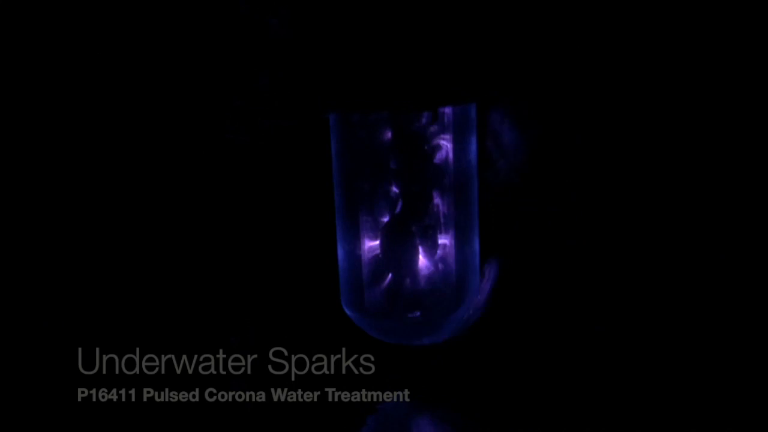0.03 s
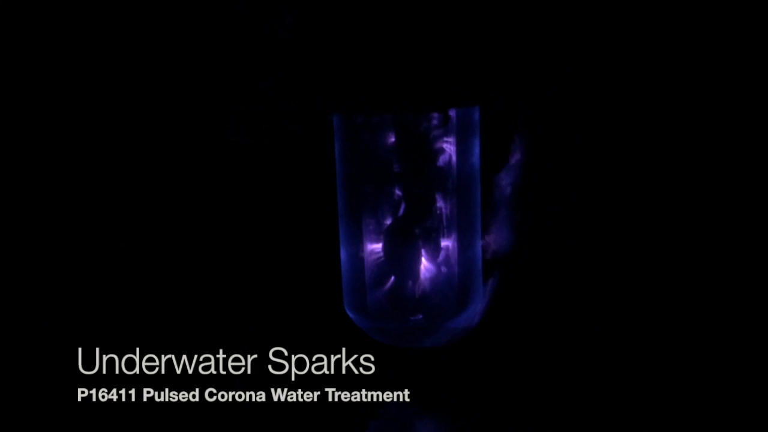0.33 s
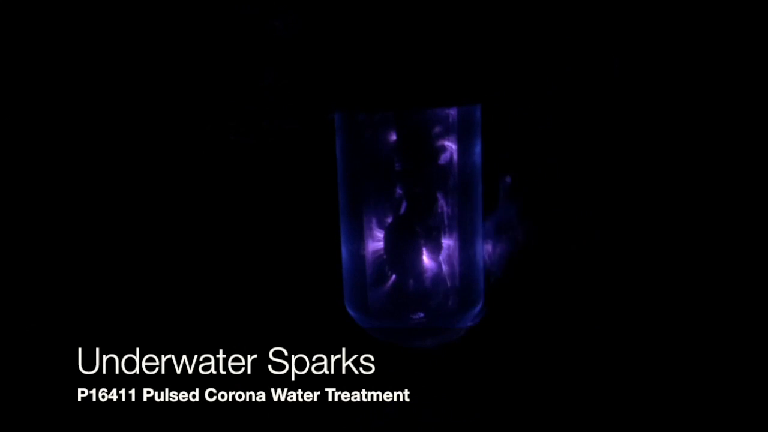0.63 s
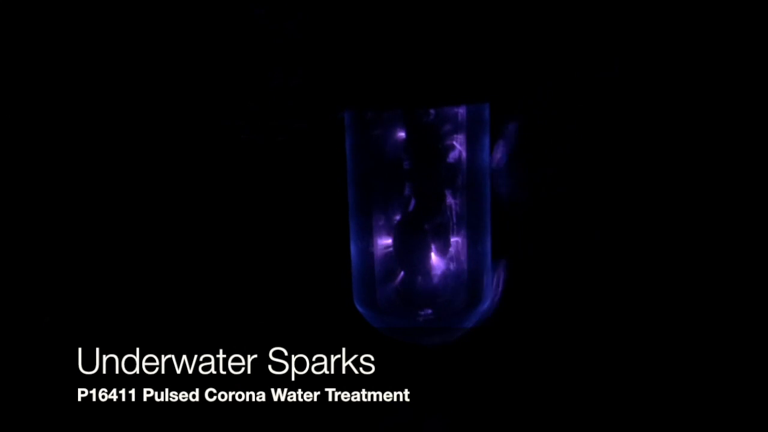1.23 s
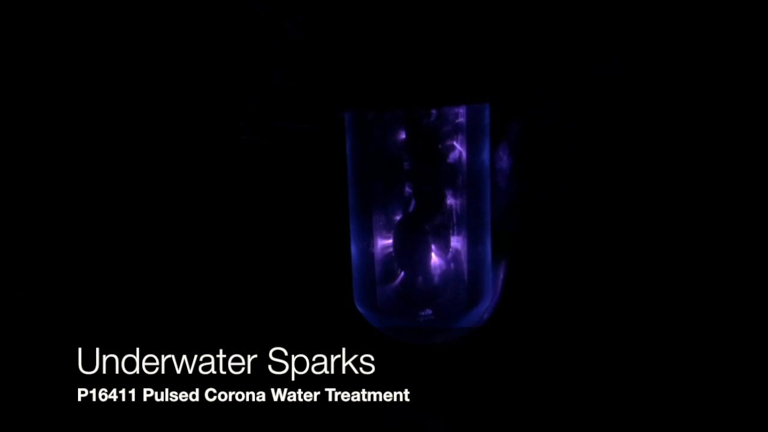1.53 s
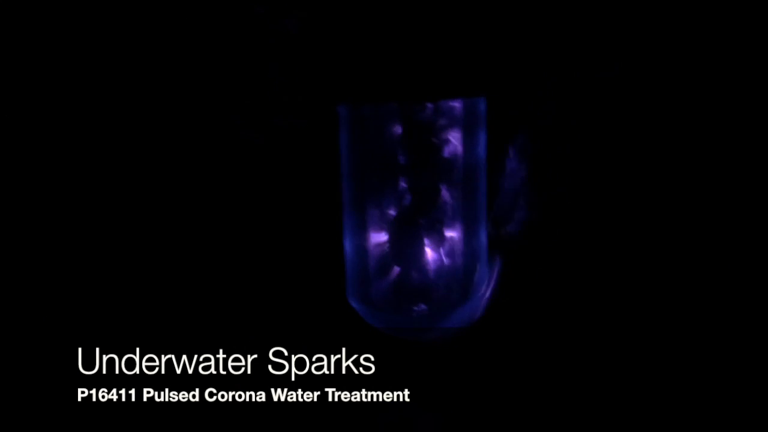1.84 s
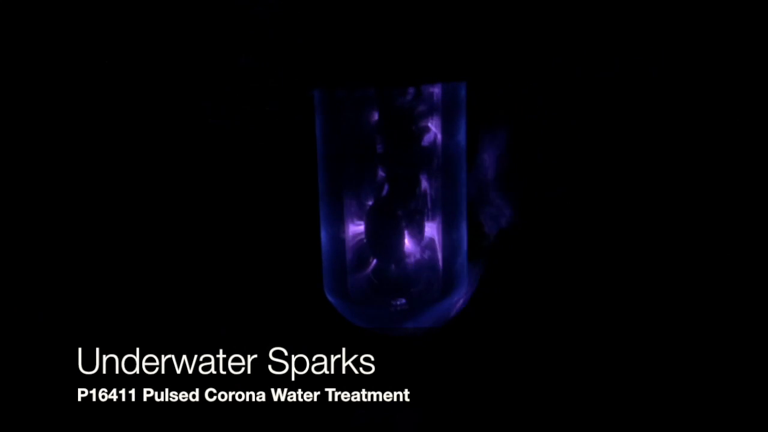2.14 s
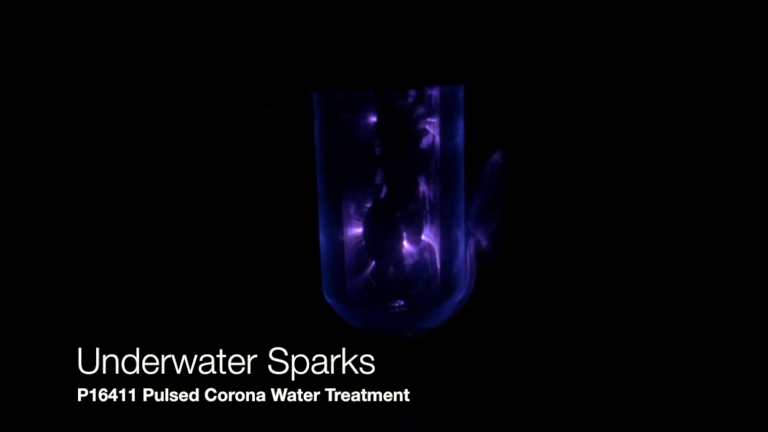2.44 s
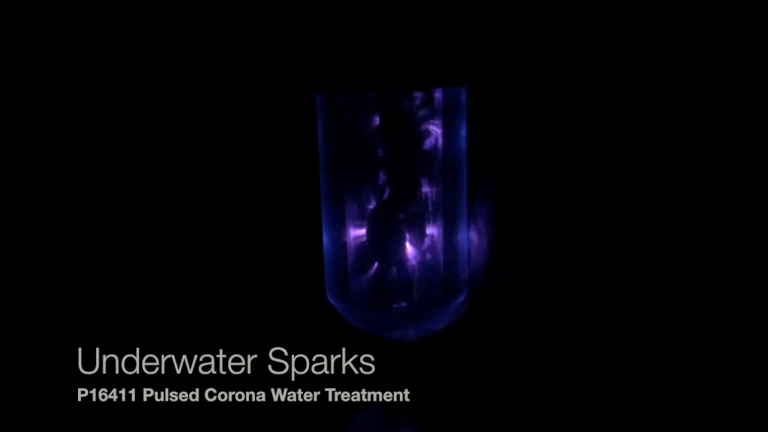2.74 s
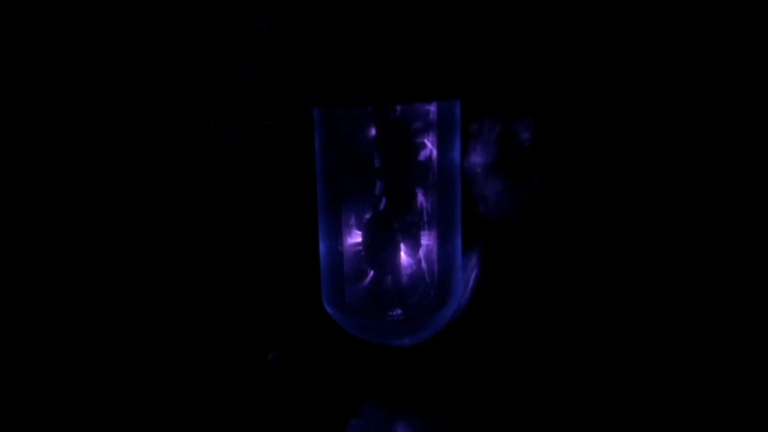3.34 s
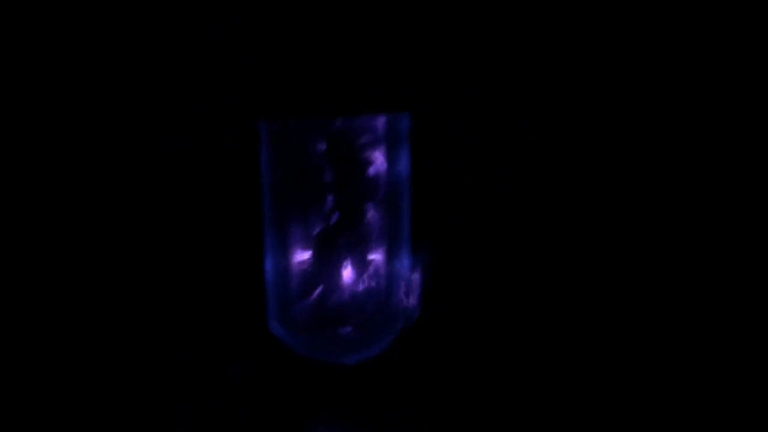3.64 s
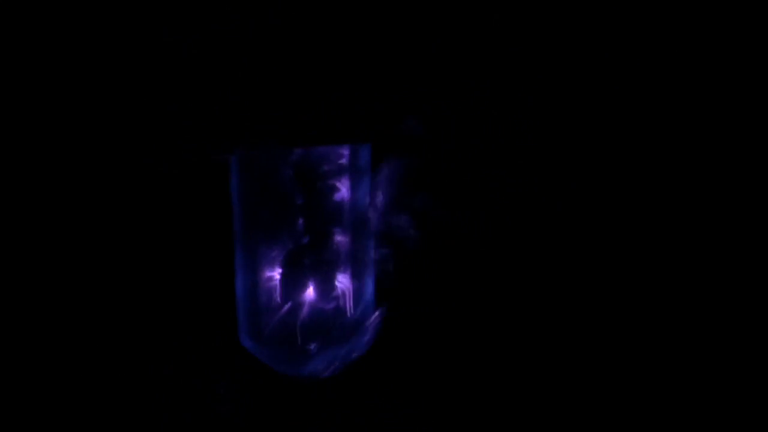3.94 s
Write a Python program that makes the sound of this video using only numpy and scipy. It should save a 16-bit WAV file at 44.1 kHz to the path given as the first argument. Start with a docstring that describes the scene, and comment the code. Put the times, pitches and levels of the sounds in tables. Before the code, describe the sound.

Electrical apparatus hums steadily with rushing fans, faint spark ticks and tiny watery blips.

```python
"""Small ticks and watery blips sound over a low drone, a rush of air and a thin whine.
A pulsed high-voltage rig sparks inside a tube of water in a laboratory: each discharge is a brief
burst of noise, and bubbles ring and excite the modes of the tube. Now and then something is bumped.
Behind them the power supply whines, and turbulence from the ventilation and the cooling fans
is coloured by the resonances of ducts and cabinet."""
import sys
import numpy as np
from scipy import signal
from scipy.fft import rfft, irfft
from scipy.io import wavfile

SR = 44100
rng = np.random.default_rng(int(sys.argv[2]) if len(sys.argv) > 2 else 0)


def wrap_up_sound(samples):
    """Save the sound to the file named by the first command line argument, as 16-bit audio."""
    columns = np.atleast_2d(samples).T
    # keep every value between -1 and 1, then stretch to whole-number steps
    tamed = np.clip(columns, -1, 1)
    steps = np.round(tamed * 32767).astype(np.int16)
    wavfile.write(sys.argv[1], SR, steps)


N = 176400


def tick(hz, width, t60):
    """Impulsive excitation: a discharge gives a wide crack, a narrow ring and a reverberant tail."""
    t = np.arange(SR // 4) / SR
    sputter_db, sputter_step_s = 9, .0012
    tail_db, room_t60_s = -19, .2
    crack_db, crack_t60_s, crack_span = -4, .022, 2.7   # span: frequency ratio either side of hz
    knots = np.arange(0, t[-1] + sputter_step_s, sputter_step_s)
    jitter = np.interp(t, knots, rng.uniform(-.88, 1, len(knots)))
    sputter = rms_one(from_db(sputter_db * jitter))
    tail = sputter * from_db(tail_db - 60 * t / room_t60_s)
    burst = rng.standard_normal(len(t)) * (from_db(-60 * t / t60) + tail)
    ring = band(burst, hz - width / 2, hz + width / 2) * np.sqrt(SR / 2 / width)
    crack = rng.standard_normal(len(t)) * sputter * from_db(crack_db - 60 * t / crack_t60_s)
    return ring + band(crack, hz / crack_span, min(hz * crack_span, 13000))


# The distinct discharges, and the sharp snaps that open the bubbles at .925 and .977 s. Each row: start in
# seconds, # level in dB, centre frequency in Hz, bandwidth in Hz, time to decay by 60 dB (t60) in seconds.
SPARKS = [(0.107, -60, 6380, 926, 0.085), (.293, -57.5, 11800, 3000, .025), (.340, -62, 8700, 2000, .03),
          (.405, -55.5, 9600, 1400, .035), (.459, -55, 13000, 7000, 0.021), (.517, -55.5, 6160, 700, 0.036),
          (0.56, -44, 10150, 1100, 0.017), (.877, -63, 9700, 2000, .02), (.925, -60, 8500, 3000, .02),
          (.977, -62, 6800, 1200, .03), (1.091, -65.5, 8200, 700, .06), (1.208, -68, 8500, 1000, 0.023),
          (1.687, -65, 11000, 2000, .025), (1.986, -52, 6230, 750, 0.031), (2.207, -63, 8800, 1000, .02),
          (2.272, -57, 10400, 1000, .03), (2.321, -56, 5700, 500, .05), (2.4389, -41, 9500, 2200, 0.023),
          (2.470, -62, 9770, 1500, .035), (2.929, -46.5, 6660, 950, 0.036), (2.935, -58, 11000, 4000, .03),
          (3.023, -63, 14000, 2000, .02), (3.653, -57, 8000, 4000, .02), (3.721, -53.5, 6750, 1800, .045)]

def discharges():
    """Superposed transients: distinct sparks stand out from a faint crackle of randomly timed ones."""
    out = np.zeros(N)
    for start, db, hz, width, t60 in SPARKS:
        add(out, start, from_db(db) * tick(hz, width, t60))
    crackle_per_s, crackle_db, spread_db = 18, -66.5, 3.5
    low_hz, high_hz = 7000, 12200
    for when, pitch, size in rng.random((int(crackle_per_s * N / SR), 3)):
        hz = low_hz + pitch * (high_hz - low_hz)
        db = crackle_db + spread_db * (2 * size - 1)
        add(out, when * N / SR, from_db(db) * tick(hz, width=1500, t60=.01))
    return out


# Modes of the water-filled tube. Each row: frequency in Hz, relative level in dB, t60 in seconds.
TUBE_MODES = [(3670, -5, 0.098), (3935, -9.5, 0.059), (4200, -13, 0.23), (5150, -26, .07)]

def blip(hz, t60):
    """Free vibration: a bubble rings at one pitch, excites the tube's modes and leaves a soft wash."""
    t = np.arange(SR // 4) / SR
    attack_s, mode_spread_db = .002, 2
    wash_db, wash_width_hz, wash_t60_s = -11.5, 1100, .19
    bubble = np.sqrt(2) * from_db(-60 * t / t60) * np.sin(2 * np.pi * hz * t)
    tube = np.zeros(len(t))
    for mode_hz, db, mode_t60 in TUBE_MODES:
        mode_db = db + mode_spread_db * rng.standard_normal()
        tube += from_db(mode_db - 60 * t / mode_t60) * np.sin(2 * np.pi * mode_hz * t)
    noise = band(rng.standard_normal(len(t)), hz - wash_width_hz / 2, hz + wash_width_hz / 2)
    wash = rms_one(noise) * from_db(wash_db - 60 * t / wash_t60_s)
    return (bubble + tube + wash) * (1 - np.exp(-t / attack_s))


# Bubbles in the tube. Each row: start in seconds, level in dB, pitch in Hz, t60 in seconds.
BUBBLES = [(.125, -49.5, 3880, .06), (0.459, -53, 2760, 0.17), (.517, -45, 4560, 0.055),
           (.590, -56, 4990, 0.065), (.926, -42, 4540, .045), (.976, -40.5, 3890, .06),
           (1.070, -51, 5050, .045), (1.080, -49, 3600, 0.054), (1.451, -50.5, 3720, 0.081),
           (2.225, -53, 4580, 0.084), (2.320, -49, 4665, 0.071), (3.567, -47.5, 3510, 0.049)]

def water():
    """Bubble resonance: each bubble sounds a short blip at its own natural frequency."""
    out = np.zeros(N)
    for start, db, hz, t60 in BUBBLES:
        add(out, start, from_db(db) * blip(hz, t60))
    return out


# Soft impacts. Each row: start in seconds, level in dB, frequency in Hz, t60 in seconds.
IMPACTS = [(.517, -17, 119.7, 0.24), (.585, -24, 126, .06), (2.93, -42.5, 1564, 0.16),
           (3.933, -23, 910, 0.046)]

def bumps():
    """Damped oscillation: each soft bump excites a single mode that decays exponentially."""
    out = np.zeros(N)
    t = np.arange(SR // 2) / SR
    attack = 1 - np.exp(-t / .0035)
    for start, db, hz, t60 in IMPACTS:
        add(out, start, from_db(db - 60 * t / t60) * attack * np.sin(2 * np.pi * hz * t))
    return out


# Steady partials of the supply's whine. Each row: harmonic number, level in dB.
STEADY_HARMONICS = [(1, -62.5), (2, -71.8), (3, -86), (5, -86)]
# The fourth harmonic slowly grows and the sixth fades. Each row: time in seconds, level in dB.
FOURTH_HARMONIC = [(.1, -92), (2.0, -89), (2.7, -82), (4.0, -83)]
SIXTH_HARMONIC = [(.1, -74), (.7, -76), (1.8, -75), (2.25, -79), (3.1, -78.5), (3.45, -76.5), (3.75, -81),
                  (4.0, -80.5)]

def power_supply():
    """Harmonic series: the whine's partials share one fundamental, and each flutters in level."""
    t = np.arange(N) / SR
    fundamental_hz, wander_hz, flutter_db = 2283.4, .5, 1.1
    phase = 2 * np.pi * np.cumsum(fundamental_hz + wander_hz * drift(rate=1.83)) / SR
    fourth_db = np.interp(t, *np.transpose(FOURTH_HARMONIC))
    sixth_db = np.interp(t, *np.transpose(SIXTH_HARMONIC))
    out = np.zeros(N)
    for harmonic, db in [*STEADY_HARMONICS, (4, fourth_db), (6, sixth_db)]:
        amplitude = np.sqrt(2) * from_db(db + flutter_db * drift(rate=6))
        out += amplitude * np.sin(harmonic * phase)
    return out


# Resonances of the ducts and cabinet. Each row: centre frequency in Hz, bandwidth in Hz, lift in dB.
ENCLOSURE_MODES = [(65, 8, 8), (167, 5, 4), (245, 12, 7), (378, 40, 5), (433, 13, 6.5), (485, 14, 6.5),
                   (664, 20, 9.5), (755, 16, 9), (871, 14, 12.5), (922, 8, 19), (958, 18, 4),
                   (1029, 27, 16.5), (1158, 16, 7), (1260, 16, 6), (1433, 36, 7.5), (1510, 18, 9.5),
                   (1792, 14, 9), (1950, 36, 9), (2625, 90, 7), (3175, 40, 7), (3412, 50, 7), (3640, 80, 5),
                   (3930, 40, 6), (4538, 44, 10.5), (4622, 60, 6)]

def airflow(spectrum):
    """Source and filter: turbulent noise of a given spectrum is lifted at each enclosure resonance."""
    hz = np.arange(N // 2 + 1) * SR / N + 1e-3
    knot_hz, knot_db = np.transpose(spectrum)
    db = np.interp(np.log(hz), np.log(knot_hz), knot_db)
    octaves_above_top = np.log2(np.maximum(hz / knot_hz[-1], 1))
    gain = from_db(db - 24 * octaves_above_top)
    for centre, width, lift_db in ENCLOSURE_MODES:
        detuning = 2 * (hz - centre) / width
        gain *= 1 + (from_db(lift_db) - 1) / (1 + detuning ** 2)
    return irfft(rfft(rng.standard_normal(N)) * gain, N) * np.sqrt(SR / 2)


# The ventilation's spectrum before resonance. Each row: frequency in Hz, level in dB in a 1 Hz band.
VENTILATION_SPECTRUM = [(15, -91), (30, -97), (45, -67), (78, -66), (100, -57), (122, -51.5), (160, -50),
                        (186, -55.5), (198, -81.5), (260, -79.5)]

def ventilation(swing_db=1.1):
    """Low-frequency turbulence: a drone made lumpy by random amplitude modulation."""
    return airflow(VENTILATION_SPECTRUM) * from_db(swing_db * drift(rate=7))


# The fans' spectrum before resonance. Each row: frequency in Hz, level in dB in a 1 Hz band.
FAN_SPECTRUM = [(25, -75.5), (100, -72), (220, -67), (400, -71.5), (500, -77.5), (600, -79), (810, -84.5),
                (1100, -79), (1500, -81), (1680, -86.5), (2300, -91), (3700, -95.5), (4600, -99),
                (5300, -104), (6700, -104), (8200, -111), (10000, -110), (11500, -113), (15000, -116)]

def cooling_fans(swing_db=.9):
    """Broadband turbulence: a steady rush through the ringing cabinet, with a slight flutter."""
    return airflow(FAN_SPECTRUM) * from_db(swing_db * drift(rate=19))


def drift(rate):
    """Low-pass noise: a random fluctuation of unit power, with its corner at `rate` Hz."""
    step, settle = 40, 2000   # audio samples per point; points dropped while the filter settles
    pole = np.exp(-2 * np.pi * rate * step / SR)
    noise = rng.standard_normal(N // step + settle + 2)
    slow = signal.lfilter([1], [1, -2 * pole, pole * pole], noise)[settle:]
    return np.interp(np.arange(N) / step, np.arange(len(slow)), rms_one(slow))


def band(x, low, high):
    """Band-pass filtering between two edges in Hz."""
    edges = np.clip([low, high], 20, .45 * SR)
    return signal.sosfilt(signal.butter(2, edges, "band", fs=SR, output="sos"), x)


def from_db(db):
    """The amplitude ratio of a level in decibels."""
    return 10 ** (np.asarray(db) / 20)


def rms_one(x):
    """Normalisation to unit power."""
    return x / np.sqrt(np.mean(x ** 2) + 1e-20)


def add(out, start, sound):
    """Superposition of a sound from a start time in seconds."""
    i = int(start * SR)
    out[i:i + len(sound)] += sound[:max(N - i, 0)]


def scene():
    """Linear superposition: the pressures of all sources sum at one microphone."""
    return (discharges() + water() + bumps() + power_supply() + ventilation() + cooling_fans())[None]


def record(dry):
    """Band limiting: the sound fades in quickly, and a steep low-pass removes the highest treble."""
    start_s, fade_s, cutoff_hz = .08, .019, 15300
    fade = np.clip((np.arange(N) / SR - start_s) / fade_s, 0, 1)
    low_pass = signal.ellip(12, .1, 80, cutoff_hz, fs=SR, output="sos")
    return signal.sosfilt(low_pass, dry * fade)


dry = scene()
out = record(dry)
wrap_up_sound(out)
```